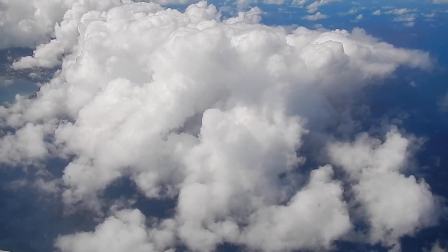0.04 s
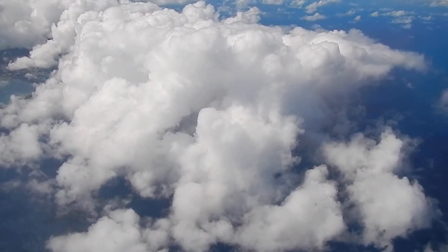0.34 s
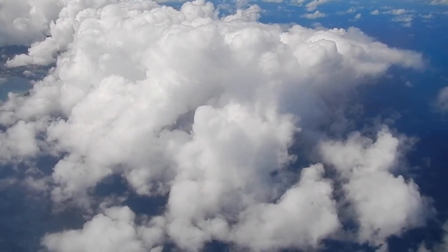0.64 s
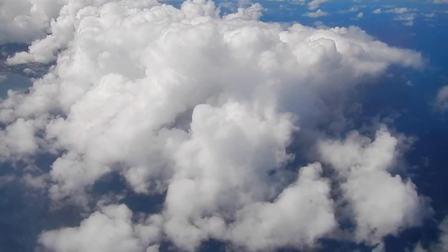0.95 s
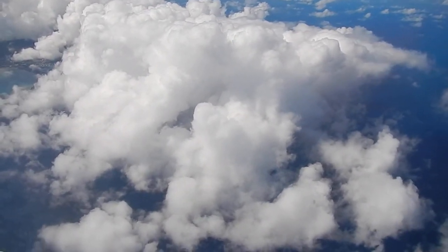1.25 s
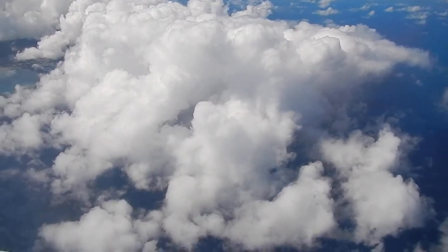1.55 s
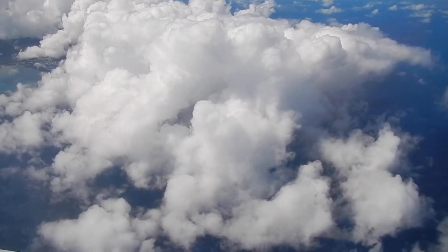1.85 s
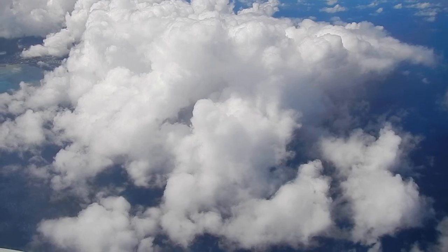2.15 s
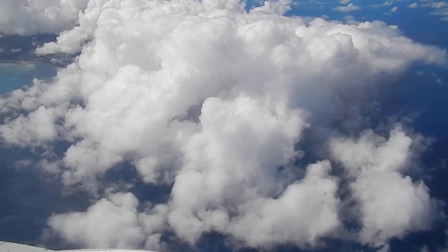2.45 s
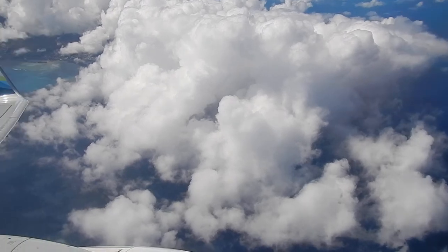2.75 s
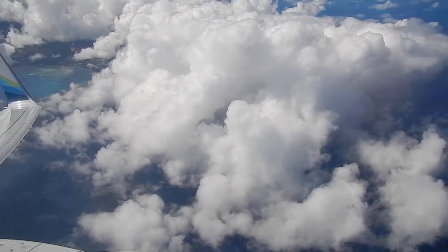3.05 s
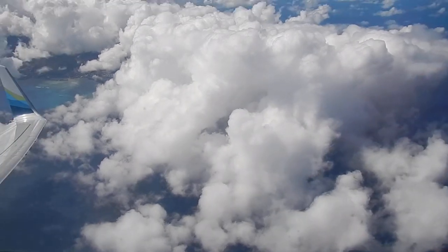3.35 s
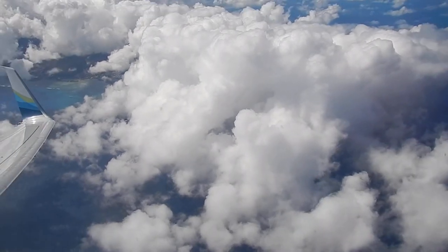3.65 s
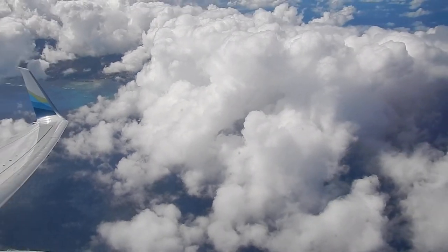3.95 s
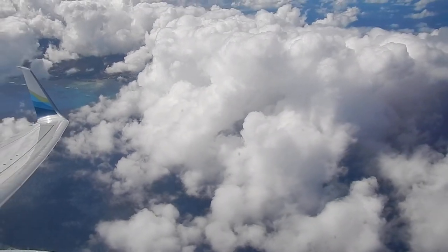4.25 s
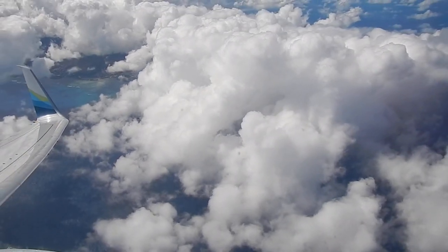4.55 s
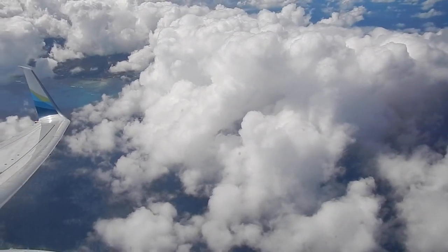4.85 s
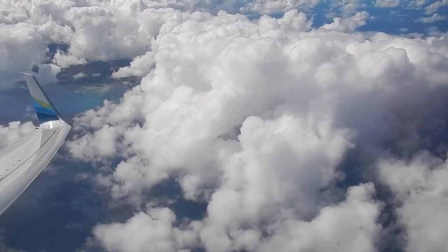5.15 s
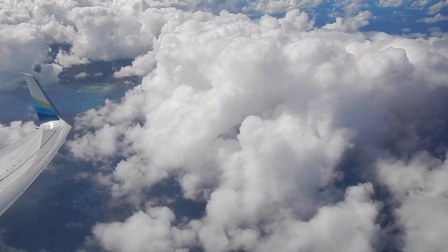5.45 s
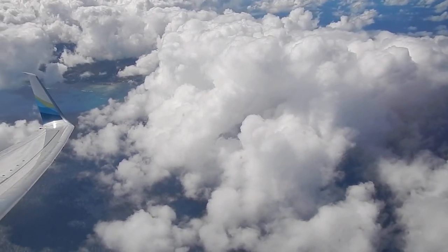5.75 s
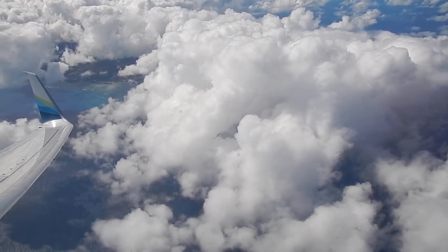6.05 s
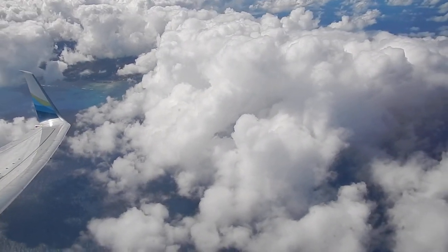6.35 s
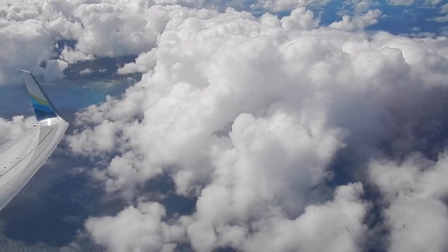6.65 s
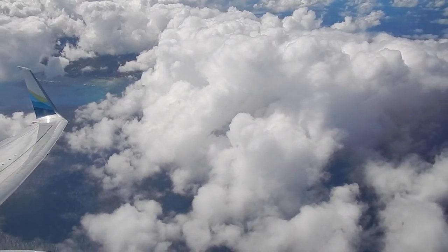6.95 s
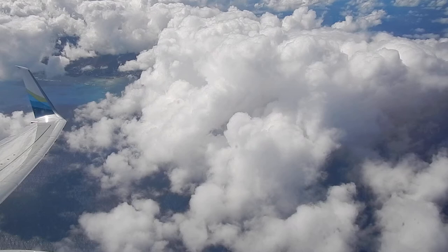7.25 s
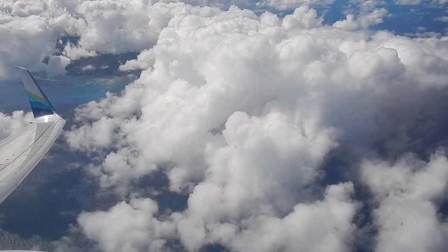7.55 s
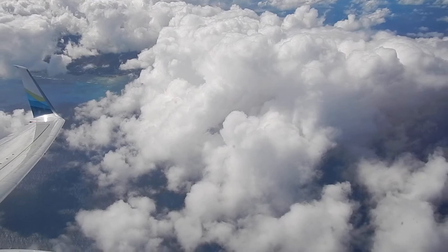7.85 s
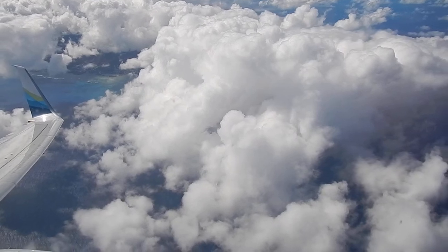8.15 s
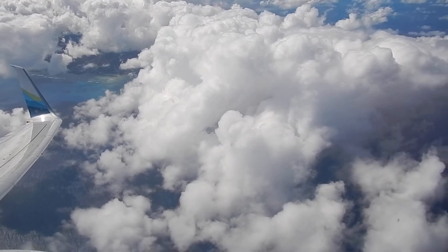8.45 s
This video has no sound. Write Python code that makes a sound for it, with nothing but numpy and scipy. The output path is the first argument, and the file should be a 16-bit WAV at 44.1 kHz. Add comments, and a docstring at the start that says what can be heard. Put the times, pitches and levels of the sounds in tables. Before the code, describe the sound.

Inside a cruising airliner, heard from a window seat, a loud, deep rush of air fills the cabin throughout. The jet engines drone within it, throbbing slowly, with a faint buzz and a thin, high whine above. A few times a second the whole sound dips slightly with a faint tick and swells back. Near the middle, a piece of plastic gives one light click close by.

```python
"""Airliner cabin at cruise

At a window seat of a twin-jet, boundary-layer noise rushes along the fuselage and booms in the cabin.
The two fans turn almost equally fast, so their drone beats; above it stand shaft orders, a blade whine,
the core's drone and thin tones of gears and pumps. A few times a second the whole sound ducks with
a faint tick and swells back. Once, a piece of plastic clicks close by."""
import sys
import numpy as np
from scipy import signal
from scipy.fft import rfft, irfft, next_fast_len
from scipy.io import wavfile
from scipy.ndimage import uniform_filter1d, minimum_filter1d

SR = 44100
rng = np.random.default_rng(int(sys.argv[2]) if len(sys.argv) > 2 else 0)


def materialize(psi):
    """Save the field psi as 16-bit PCM at rate SR to the path in sys.argv[1].

    A 1-D psi becomes a single channel; in a 2-D psi each row is a channel.
    """
    bounded = np.clip(np.atleast_2d(psi).T, -1, 1)
    quanta = np.round(bounded * 32767).astype(np.int16)
    wavfile.write(sys.argv[1], SR, quanta)


N = 383229
TIME = np.arange(N) / SR
FAN_HZ, BLADES = 82.435, 24  # the near fan's initial shaft speed and its blade count

# deep tones of both fans: (shaft order [1], near fan level [dB], far fan level [dB])
DRONE_ORDERS = [(1, -20.5, -25.5), (4, -17.5, -32.5)]
# abrupt dips of the whole sound: (time [s], level dropped to [dB])
LEVEL_DIPS = [(0.0, 0.2), (0.245, 0.9), (0.354, -0.9), (0.475, -4.0), (0.711, -2.6), (0.948, -2.2),
              (1.119, -3.8), (1.47, -2.5), (1.712, -1.7), (1.968, -2.7), (2.224, -1.4), (2.312, -2.6),
              (2.586, -1.7), (2.751, -4.0), (3.058, -2.2), (3.27, -3.4), (3.558, -1.6), (3.689, -3.4),
              (3.913, -2.6), (4.348, -0.8), (4.394, -2.1), (4.671, -4.0), (4.833, -3.8), (5.155, -2.4),
              (5.253, -5.3), (5.657, -2.0), (5.915, -1.1), (6.02, -2.5), (6.322, -1.0), (6.65, -1.6),
              (6.88, -2.7), (6.99, -4.0), (7.232, -3.3), (7.453, -3.9), (7.861, -3.9), (8.221, -3.2),
              (8.444, -2.8)]


def from_db(db):
    """Amplitude ratio of a level: 20 dB is a factor of ten."""
    return 10 ** (np.asarray(db) / 20)


def rms_one(x):
    """Normalisation to unit mean power."""
    return x / np.sqrt(np.mean(x ** 2) + 1e-20)


def at_hz(points, hz):
    """Interpolation of a spectrum on a logarithmic frequency axis."""
    known_hz, values = np.transpose(points)
    return np.interp(np.log(hz), np.log(known_hz), values)


def drift(rate_hz):
    """Slow random fluctuation of unit rms: noise at every 100th sample through a two-pole low-pass."""
    pole = np.exp(-200 * np.pi * rate_hz / SR)
    noise = rng.standard_normal(N // 100 + 1002)
    slow = signal.lfilter([1], [1, -2 * pole, pole * pole], noise)[1000:]  # once settled
    return np.interp(np.arange(N) / 100, np.arange(len(slow)), rms_one(slow))


def ring(pushes, hz, t60_s):
    """Damped resonator: a unit impulse starts a unit sine that falls 60 dB in t60_s."""
    radius, angle = from_db(-60 / (t60_s * SR)), 2 * np.pi * hz / SR
    return signal.lfilter([0, np.sin(angle)], [1, -2 * radius * np.cos(angle), radius ** 2], pushes + 1e-18)


def impulses(times, sizes):
    """Impulsive excitation: one-sample pushes at the given times."""
    out = np.zeros(N)
    out[np.clip(np.round(np.asarray(times) * SR).astype(int), 0, N - 1)] = sizes
    return out


def tone(turns, level_db):
    """Simple harmonic motion of a given rms level, its phase counted in cycles."""
    return np.sqrt(2) * from_db(level_db) * np.sin((2 * np.pi * (turns % 1)).astype(np.float32))


def shaft_turns(creep_hz_per_s=.016):
    """Phase is the integral of speed: turns made by the near fan as it creeps faster."""
    return np.cumsum(FAN_HZ + creep_hz_per_s * TIME) / SR


def air_rush(level_db=-17.5, surge_db=.5):
    """Boundary-layer noise with broad peaks; narrow hollows are cut into it. Coherent at the ears in the bass,
    diffuse on top."""
    # air rushing along the skin: (frequency [Hz], relative spectral density [dB])
    spectrum = [(22, -29.5), (55, -12.5), (135, 1.5), (250, -11), (430, -10.5), (700, -19), (1050, -23),
                (1400, -32.5), (1900, -35), (2700, -47), (4000, -47), (6200, -51.5), (7600, -71),
                (15500, -83)]
    # broad peaks of the rush, and narrow hollows cut into it: (centre [Hz], width [Hz], gain [dB])
    colour = [(290, 34, -3.5), (344.2, 97.5, 10.5), (805, 59, 5.5), (2470, 53, -16), (3182, 110, -30),
              (3860, 200, 4), (4620, 450, 10), (5100, 70, -7), (5180, 360, -7), (9700, 2000, 5.5)]
    # stereo width: (frequency [Hz], side minus mid [dB])
    width = [(30, -13), (70, -13), (130, -20), (330, -27.5), (550, -20), (800, -16), (1200, -17.5),
             (2000, -13), (2700, -3.5), (4600, -6.5), (6000, -0.5), (9000, 2), (14000, -5.5)]
    size = next_fast_len(N)
    hz = np.maximum(np.fft.rfftfreq(size, 1 / SR), 1)
    shape_db = at_hz(spectrum, hz)
    for centre_hz, width_hz, peak_db in colour:
        shape_db += peak_db * .5 ** ((2 * (hz - centre_hz) / width_hz) ** 2)
    white = rfft(rng.standard_normal((2, size)))
    mid = irfft(white[0] * from_db(shape_db), size)[:N]
    side = irfft(white[1] * from_db(shape_db + at_hz(width, hz)), size)[:N]
    ears = rms_one(np.array([mid + side, mid - side]))
    return from_db(level_db + surge_db * drift(1.3)) * ears


def fan_drone(slip_hz=.476, opposed_s=.1, wobble_db=1.3):
    """Beats: the slower, far fan slips in and out of phase with the near one, so their tones throb."""
    near = shaft_turns()
    far = near - slip_hz * (TIME - opposed_s) + .5
    out = np.zeros((2, N))
    for order, near_db, far_db in DRONE_ORDERS:
        # the deepest tone stands in the cabin a little out of phase between the ears
        phase = rng.random() + .032 / order ** 2 * np.array([[.5], [-.5]])
        out += tone(order * near + phase, near_db + wobble_db * drift(2.7))
        out += tone(order * far + phase, far_db)
    return out


def shaft_tone(shaft, order, level_db, pan_db):
    """A shaft harmonic, phase-modulated by turbulence; shorter waves reach the ears more out of step."""
    turns = order * shaft + rng.random() + .054 * drift(1.8)
    ear_turns = .0011 * order * rng.choice([-1, 1])
    left = tone(turns + ear_turns, level_db + pan_db / 2)
    right = tone(turns - ear_turns, level_db - pan_db / 2)
    return np.array([left, right])


def fan_buzz(flutter_db=2.5, uneven_db=1, scatter_db=3, orders=79):
    """Slightly unequal blades repeat only once a turn, so they sound a harmonic series on the shaft."""
    # prominent harmonics: (shaft order [1], level [dB], left minus right [dB])
    strong_orders = [(3, -32.5, 1.5), (5, -31.5, 0.5), (8, -49, 0.5), (13, -50.5, 1), (17, -55.5, 2),
                     (19, -51, 1), (20, -51, 2), (29, -61.5, 1), (33, -62, 2), (37, -65, 3.5),
                     (47, -63, -4.5), (52, -60.5, 10.5), (53, -63.5, -1), (56, -57.5, 2)]
    # spectral envelope of the remaining harmonics: (frequency [Hz], level [dB])
    envelope = [(500, -51), (1200, -68), (2120, -60.5), (2550, -73.5), (3150, -79.5), (3500, -72),
                (4500, -64.5), (5000, -77.5), (6200, -75), (6600, -81.5)]
    shaft, out = shaft_turns(), np.zeros((2, N))
    strong = {order: (level_db, pan_db) for order, level_db, pan_db in strong_orders}
    drone_and_whine = [row[0] for row in DRONE_ORDERS] + [BLADES]
    for order, (excess, side) in enumerate(rng.standard_normal((orders, 2)), 1):
        if order not in drone_and_whine:
            ordinary = at_hz(envelope, order * FAN_HZ) + uneven_db * excess, scatter_db * side
            level_db, pan_db = strong.get(order, ordinary)
            out += shaft_tone(shaft, order, level_db + flutter_db * drift(2.8), pan_db)
    return out


def blade_whine(base_db=-43, flutter_db=1):
    """One clear note at the blade-passing frequency: shaft speed times the number of blades."""
    # slow ebb and swell of the whine: (time [s], gain [dB])
    swell = [(0.0, 1.5), (3.5, -2), (5.8, -0.5), (7.3, 3.5), (8.69, 2)]
    level_db = base_db + np.interp(TIME, *np.transpose(swell)) + flutter_db * drift(6.5)
    return shaft_tone(shaft_turns(), BLADES, level_db, pan_db=0)


def engine_core(core_hz=239.24, hum_hz=58.15):
    """Steady rotation gives a steady pitch: the fast core shaft drones over a faint, wavering hum."""
    drone = tone(core_hz * TIME + rng.random(), level_db=-25 + .5 * drift(4.8))
    hum = tone(hum_hz * TIME + rng.random(), level_db=-43.5 + 2 * drift(.98))
    return drone + hum


def gears_and_pumps(flutter_db=3, waver_turns=.1):
    """Rotating accessories add thin tones that waver by random phase and amplitude modulation."""
    # tones between the shaft orders: (frequency [Hz], level [dB])
    whines = [(1308, -56.5), (1447, -58), (1503, -55.5), (1893, -63), (2297, -63.5)]
    out = np.zeros(N)
    for hz, level_db in whines:
        turns = hz * TIME + rng.random() + waver_turns * drift(4.4)
        out += tone(turns, level_db + flutter_db * drift(1.5))
    return out


def ducking(attack_hz=300, swell_db_per_s=16.4, full_db=4.2):
    """Sawtooth amplitude modulation: the level drops abruptly, then climbs steadily up to a limit."""
    times, dip_db = np.transpose(LEVEL_DIPS)
    latest = np.maximum(np.searchsorted(times, TIME, "right") - 1, 0)
    saw_db = np.minimum(dip_db[latest] + swell_db_per_s * (TIME - times[latest]), full_db)
    return from_db(signal.sosfilt(signal.butter(1, attack_hz, fs=SR, output="sos"), saw_db))


def ticks(bump_db=-9, fizz_db=-44, fizz_hz=7800, fizz_decay_s=.0007):
    """A heavily damped resonance and a decaying noise burst mark each dip after the first."""
    pushes = impulses([time for time, _ in LEVEL_DIPS[1:]], 1)
    bump = ring(pushes * rng.choice([-1, 1], N), hz=550, t60_s=.003)
    fade = signal.lfilter([1], [1, -np.exp(-1 / (fizz_decay_s * SR))], pushes + 1e-18)
    low_pass = signal.butter(2, fizz_hz, fs=SR, output="sos")
    hiss = rms_one(signal.sosfilt(low_pass, rng.standard_normal(N)))
    return from_db(bump_db) * bump + from_db(fizz_db) * fade * hiss


def plastic_click():
    """Free vibration: one light snap excites a few short-lived modes of a plastic part."""
    # the snap: (time [s], impulse level [dB])
    snaps = [(3.5582, -30)]
    # modes of the plastic: (frequency [Hz], gain [dB], time to fall 60 dB [s])
    modes = [(2070, 4, 0.011), (5800, -3, .005), (9400, -15, .004)]
    times, snap_db = np.transpose(snaps)
    pushes = impulses(times, from_db(snap_db))
    return sum(from_db(mode_db) * ring(pushes, hz, t60_s) for hz, mode_db, t60_s in modes)


def limiter(x, ceiling, window=131):
    """Look-ahead limiting: the gain eases down around any crest above the ceiling."""
    allowed = ceiling / np.maximum(np.abs(x).max(axis=0), ceiling)
    held = minimum_filter1d(allowed, 2 * window + 1)
    return x * uniform_filter1d(uniform_filter1d(held, window), window)


def scene(left_db=.21):
    """Superposition: the cabin's sounds add and duck together under the ticks, a shade louder at left."""
    cabin = air_rush() + fan_drone() + fan_buzz() + blade_whine() + engine_core() + gears_and_pumps()
    ducked = (cabin + plastic_click()) * ducking()
    return (ducked + ticks()) * from_db([[left_db], [-left_db]])


def record(dry, low_hz=34, top_hz=15800):
    """Band and peak limiting: the deepest rumble goes, crests are held down, the top is cut steeply."""
    lean = signal.sosfilt(signal.butter(4, low_hz, "high", fs=SR, output="sos"), dry)
    held = limiter(lean, ceiling=.82)
    return signal.sosfilt(signal.ellip(10, .1, 80, top_hz, fs=SR, output="sos"), held)


dry = scene()
out = record(dry)
materialize(out)
```